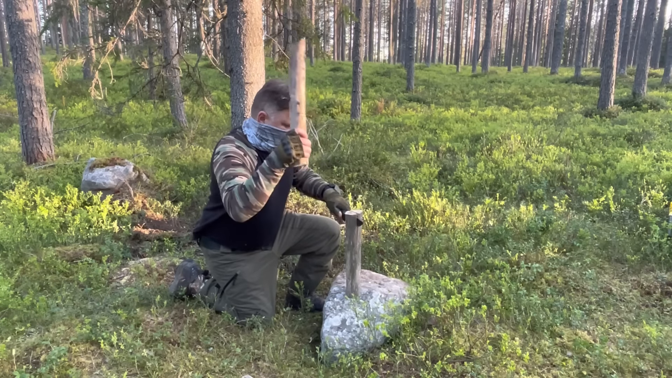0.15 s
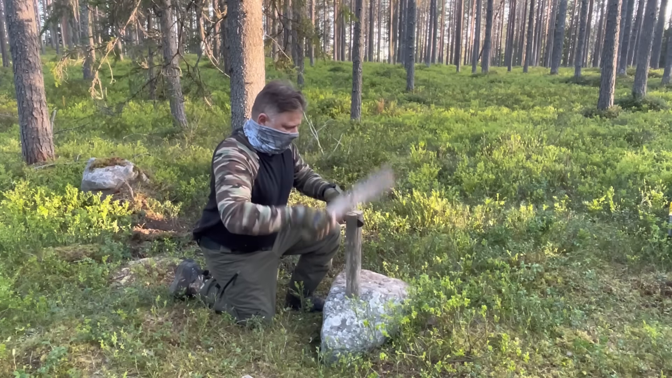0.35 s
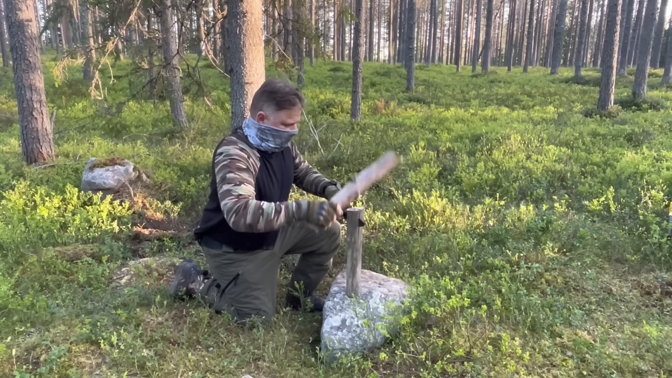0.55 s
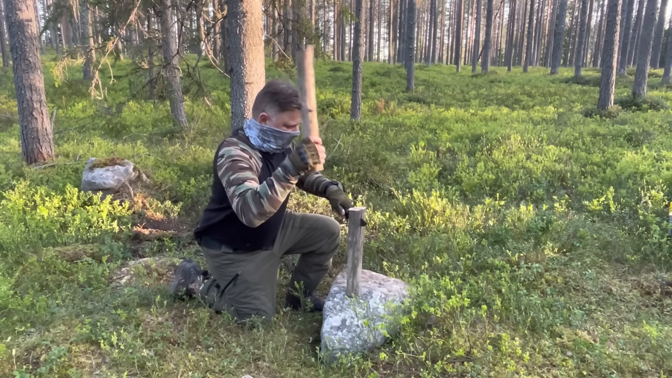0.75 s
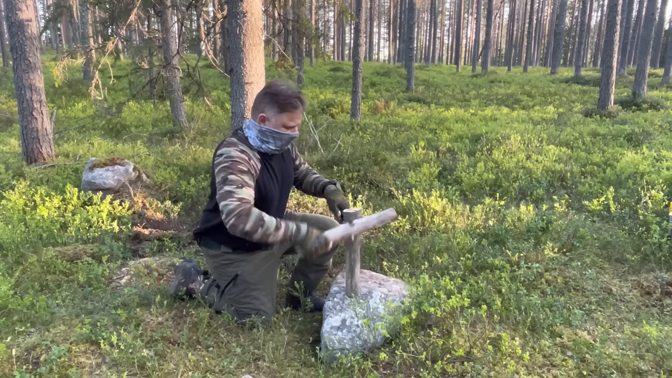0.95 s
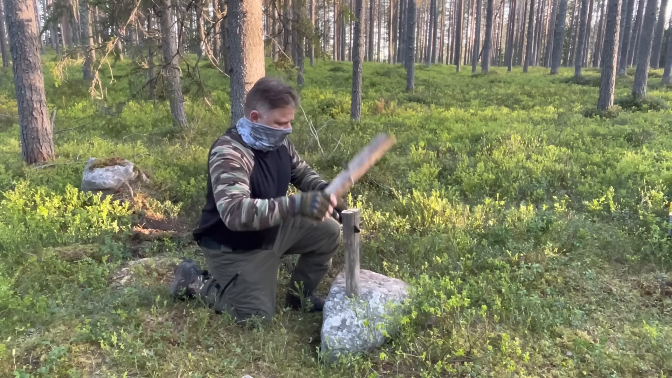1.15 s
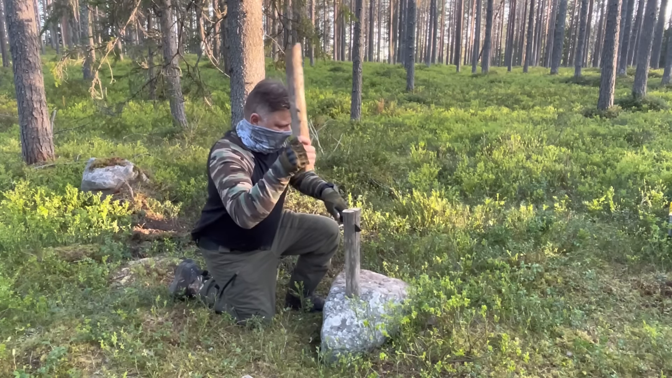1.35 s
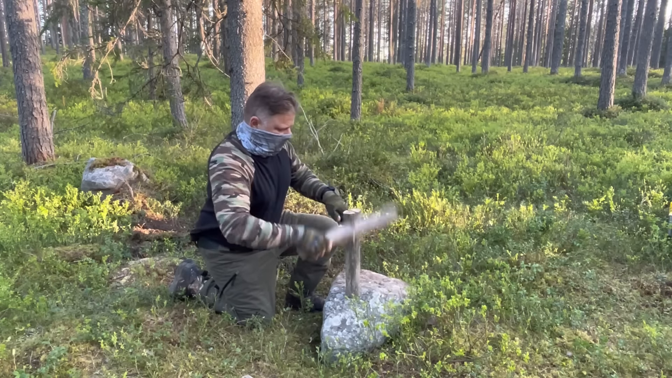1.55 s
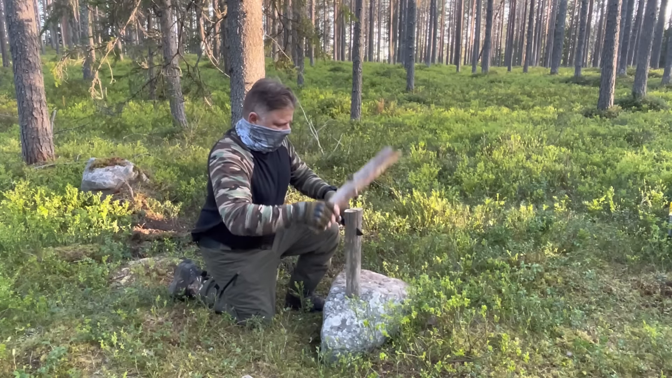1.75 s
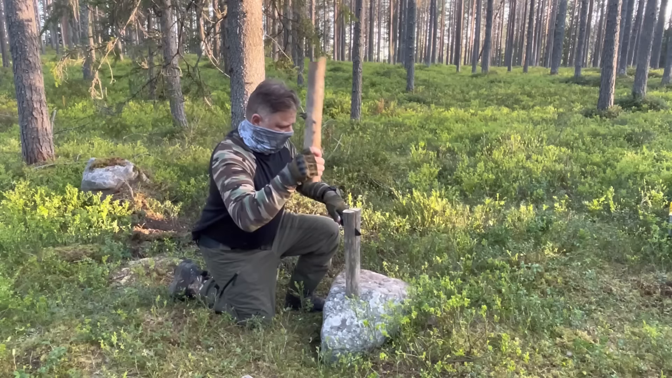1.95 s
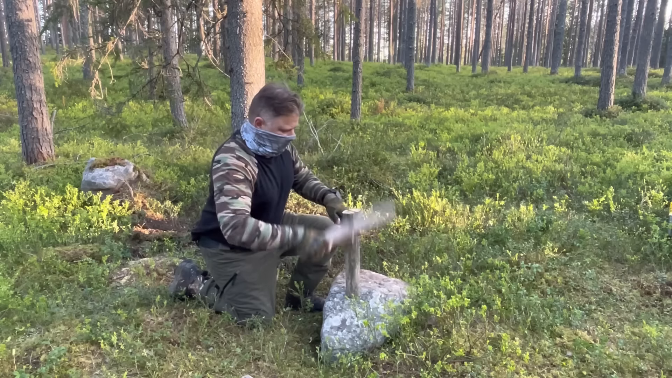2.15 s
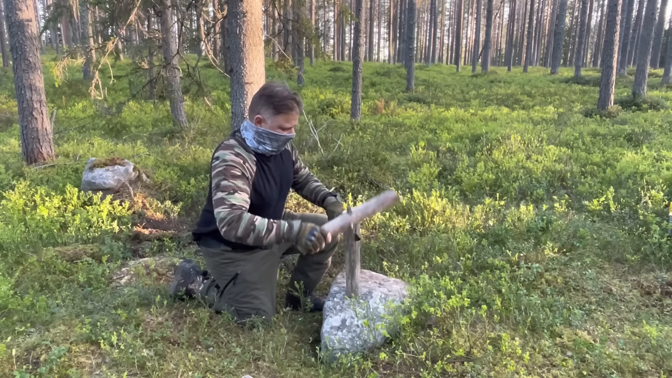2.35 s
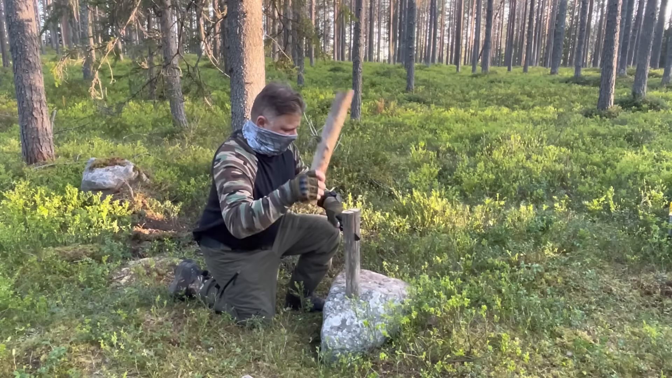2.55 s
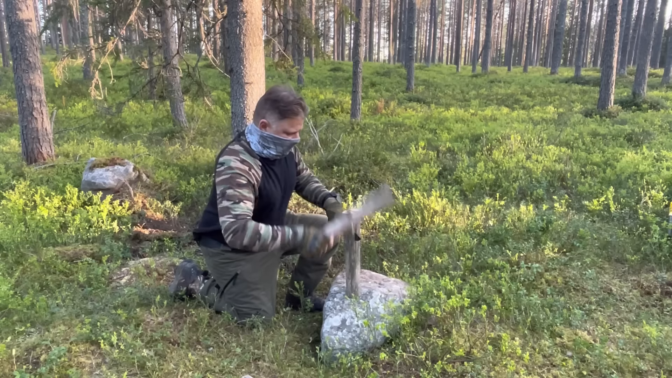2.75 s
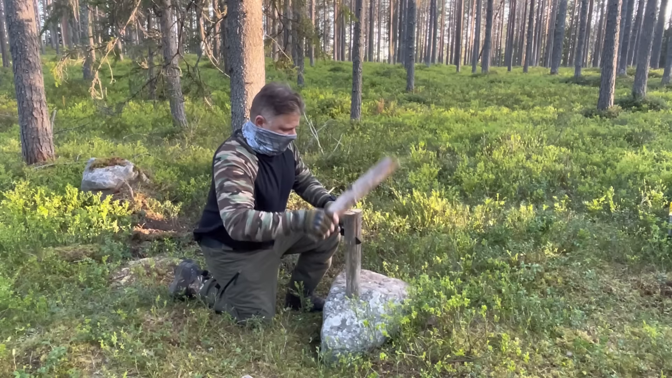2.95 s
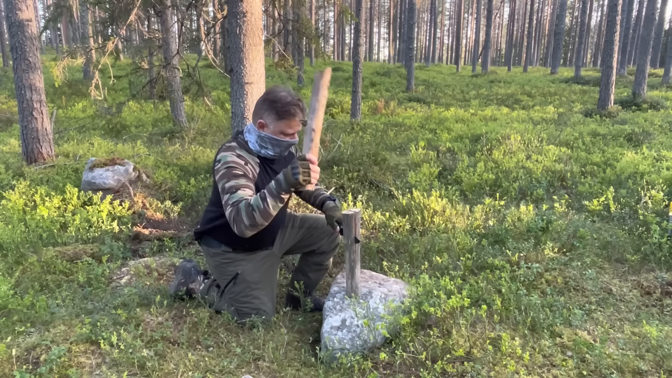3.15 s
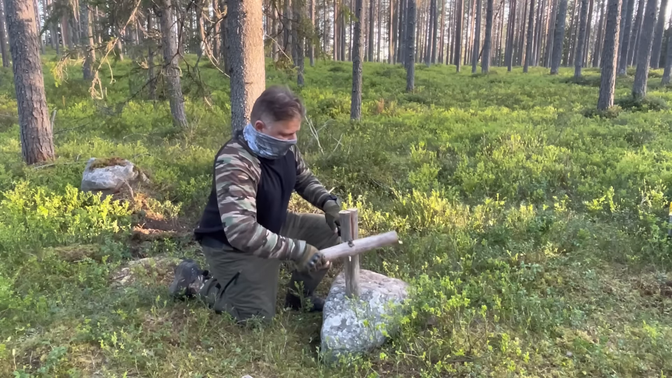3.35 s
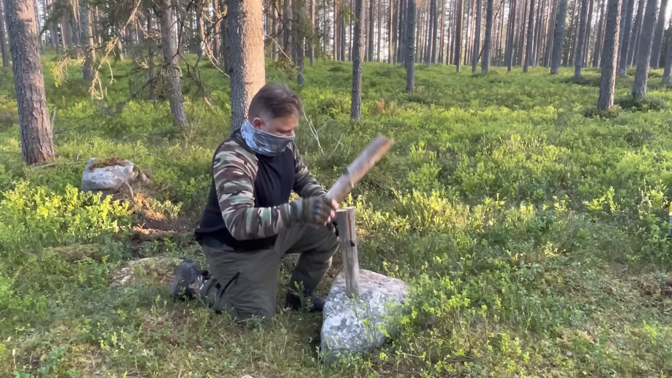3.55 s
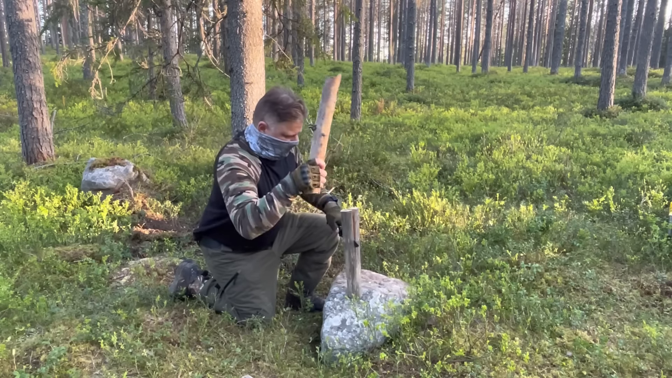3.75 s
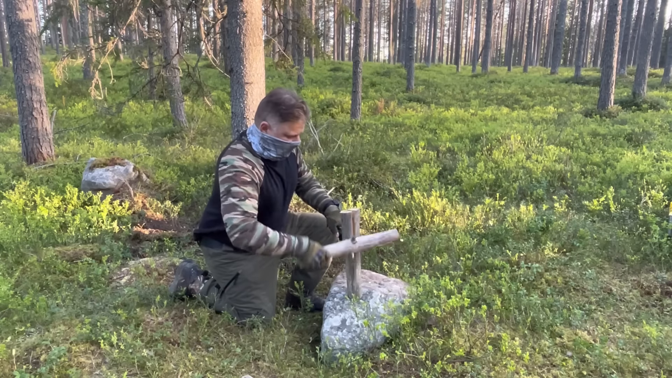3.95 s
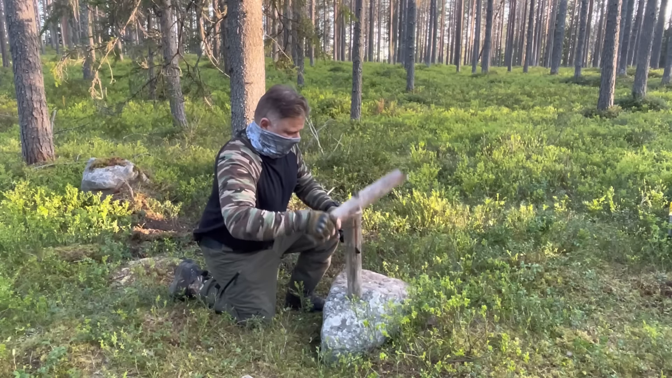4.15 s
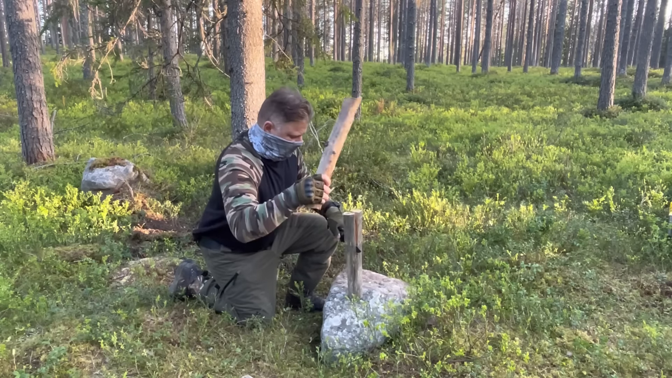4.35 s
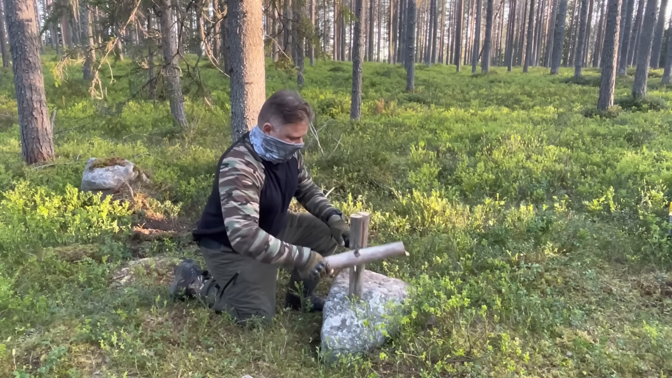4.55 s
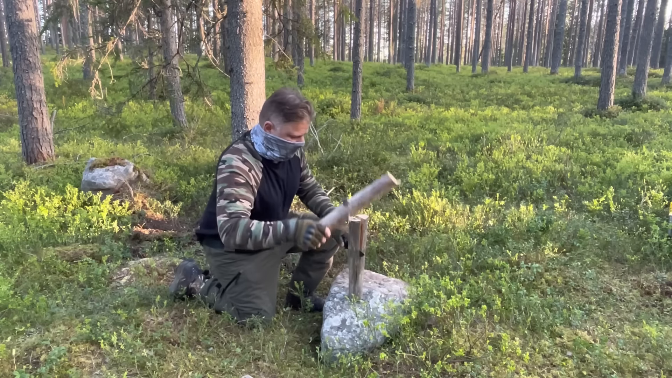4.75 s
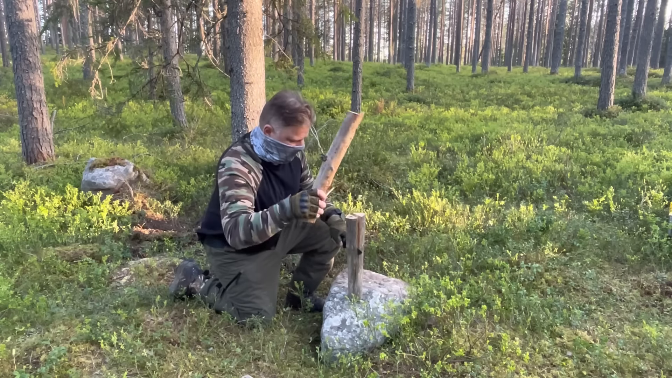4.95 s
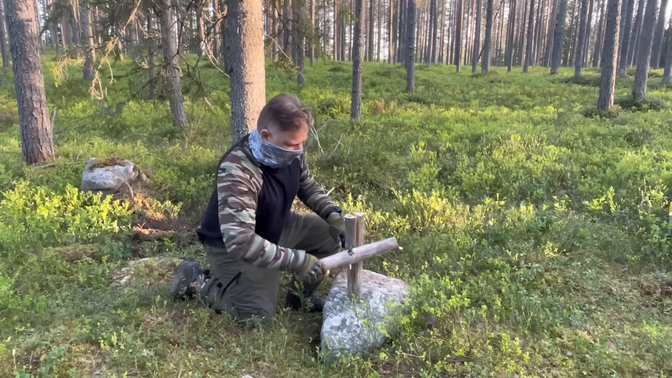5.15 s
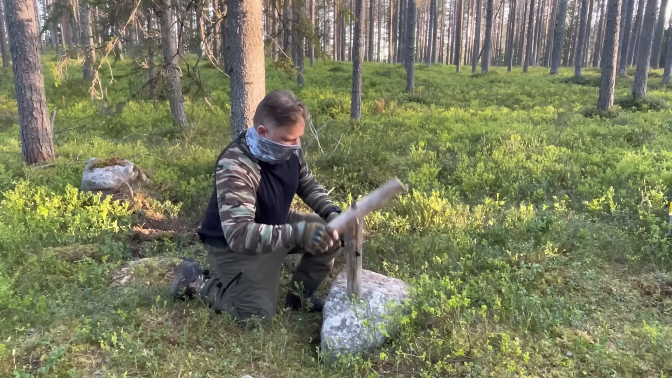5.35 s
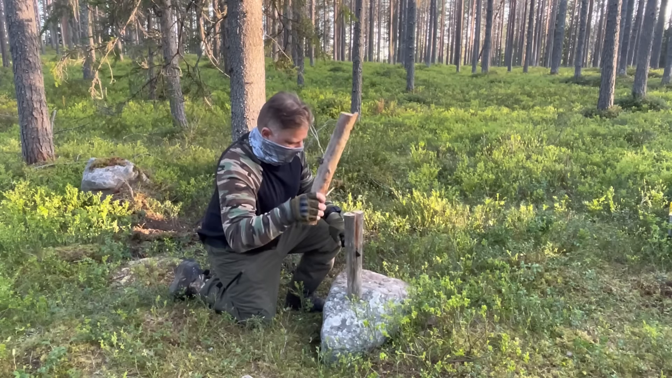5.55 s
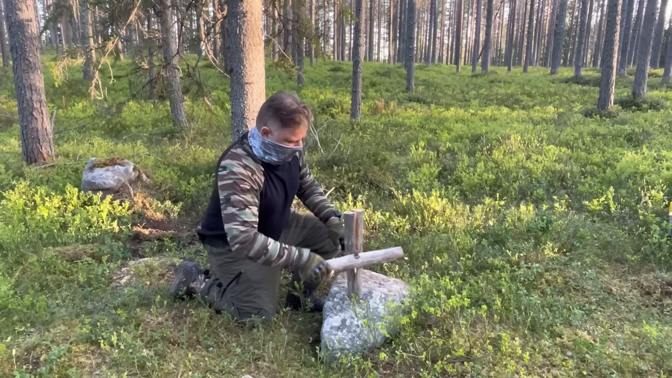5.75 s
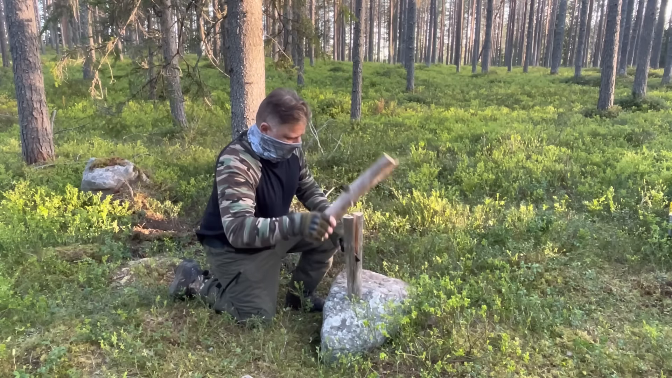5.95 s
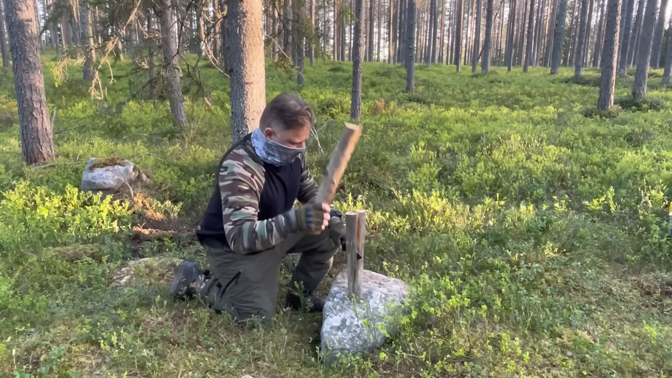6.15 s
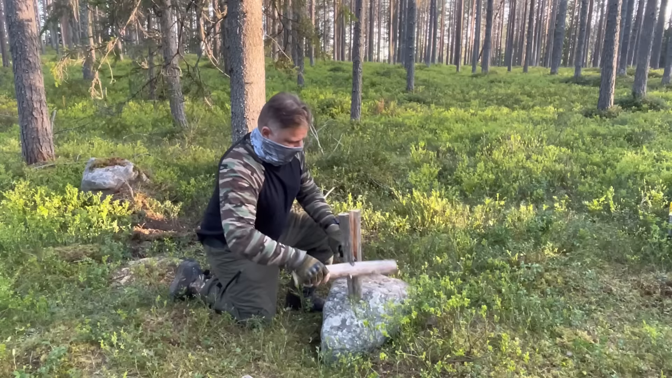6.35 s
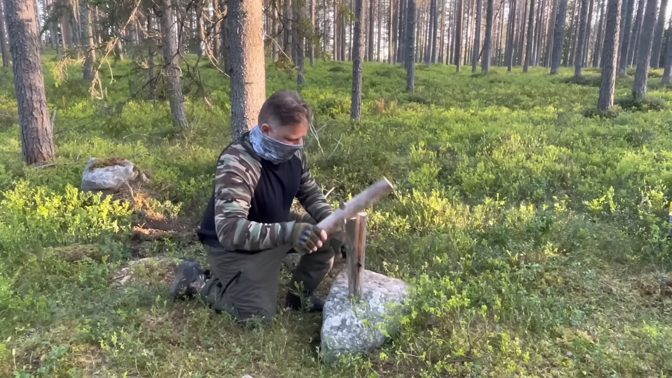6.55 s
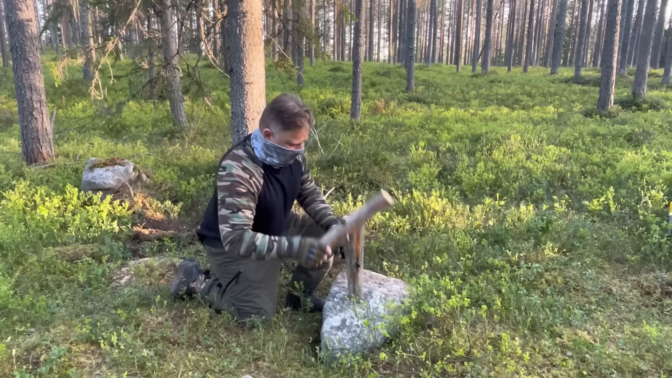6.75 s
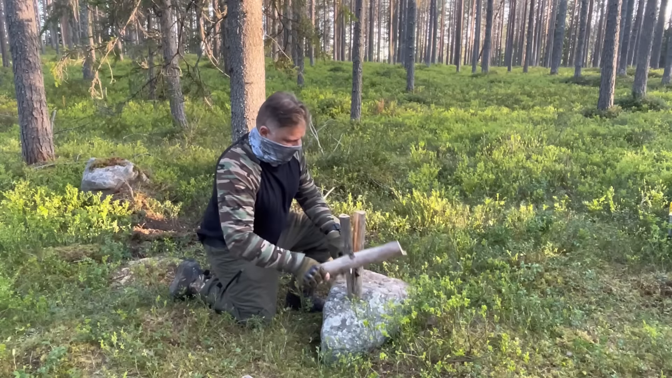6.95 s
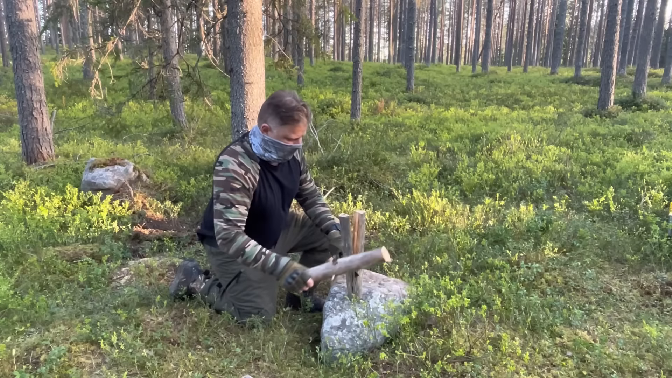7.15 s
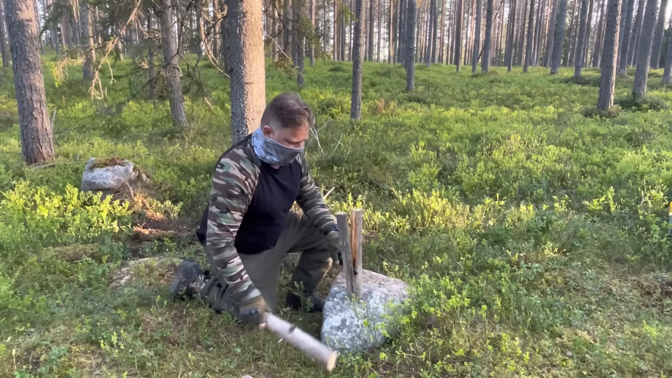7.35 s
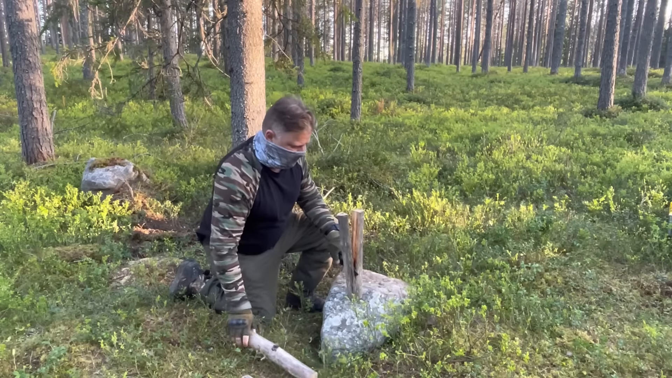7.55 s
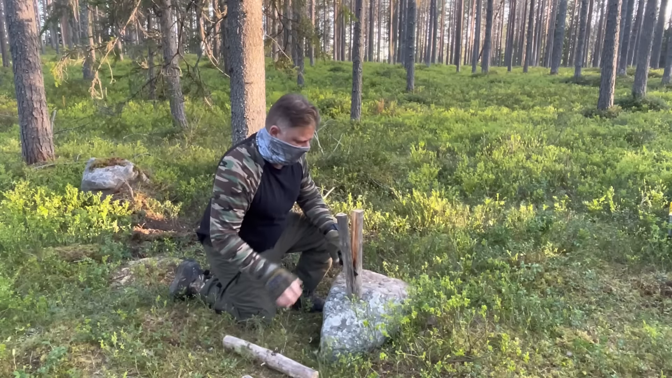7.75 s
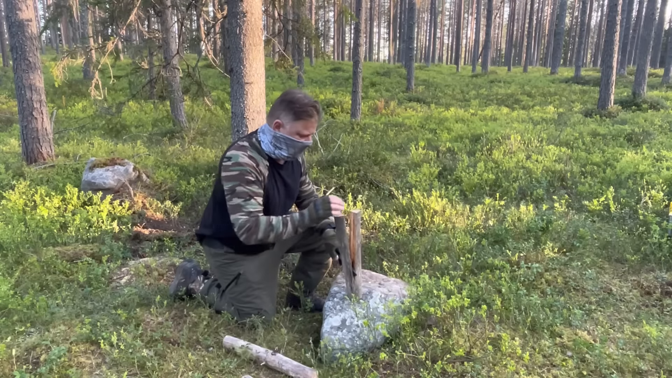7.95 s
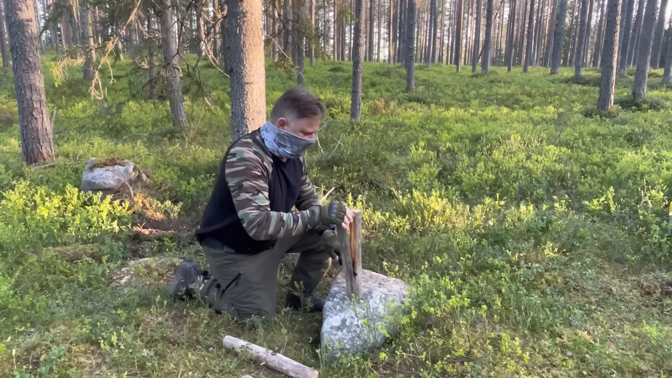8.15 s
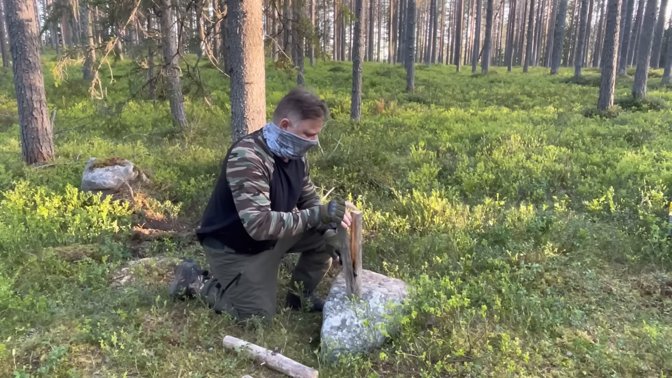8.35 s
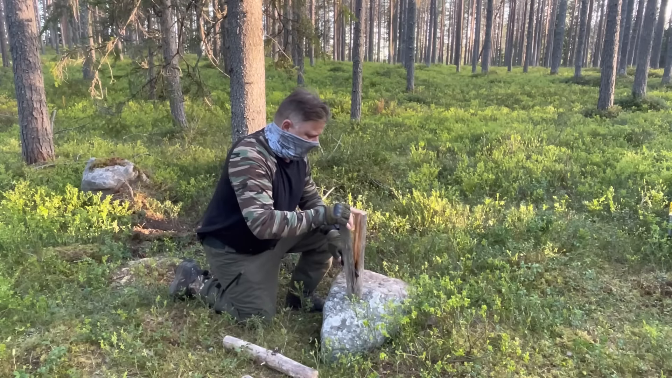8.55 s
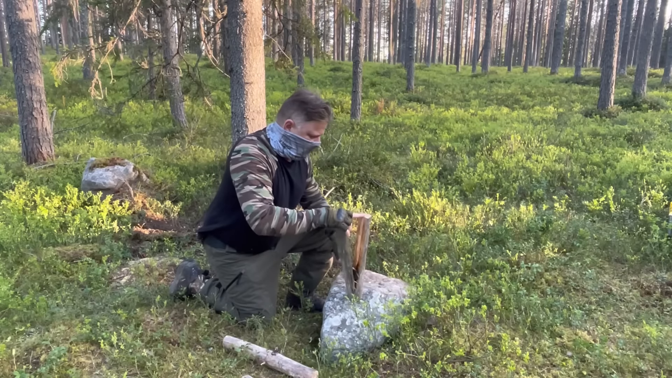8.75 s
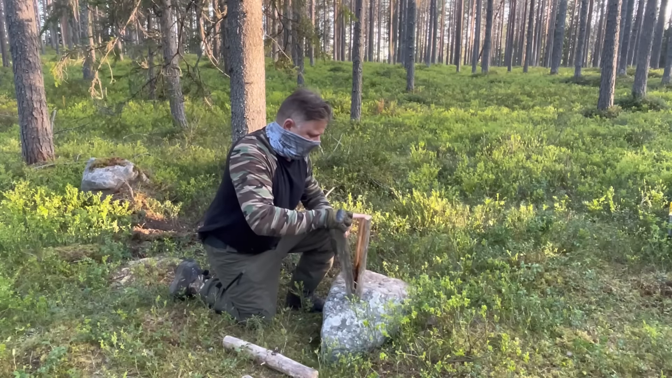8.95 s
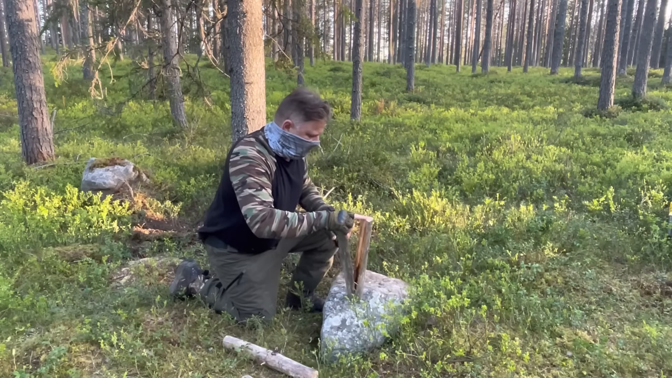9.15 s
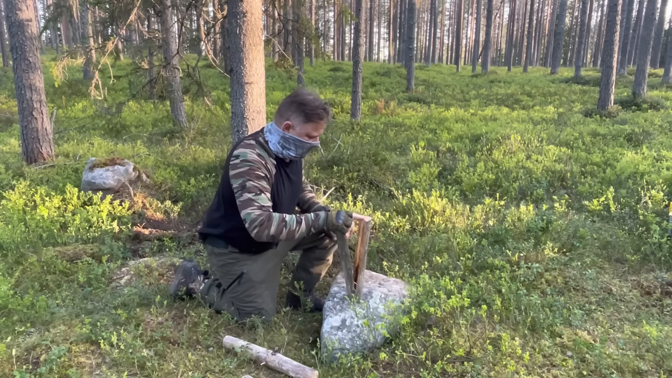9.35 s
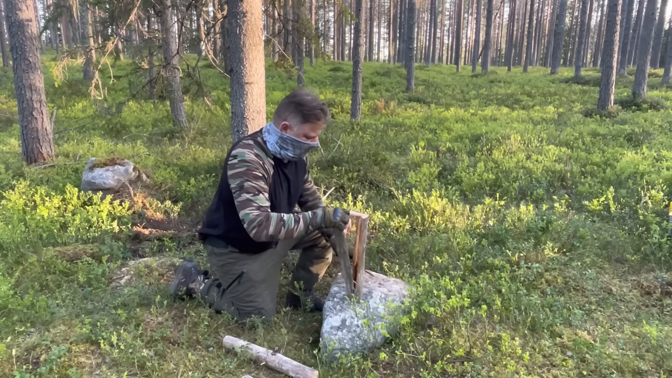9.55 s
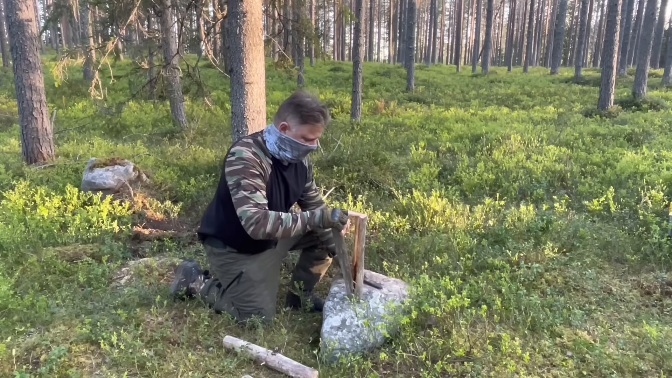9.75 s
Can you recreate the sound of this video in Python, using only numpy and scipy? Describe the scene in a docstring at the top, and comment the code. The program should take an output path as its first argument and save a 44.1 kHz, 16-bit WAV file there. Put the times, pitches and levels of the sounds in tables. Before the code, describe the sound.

Close to the microphone in a still forest, firewood is split with a knife and a wooden baton. Loud, regular knocks ring briefly and return from the trunks, while the wood tears more sharply under the last blows. Much quieter sounds follow: the stick landing on moss, a rustle of sleeves and leaves, and the halves snapping apart and knocking together, over a faint hush of air.

```python
"""A wooden baton drives a knife down through a log on a stone, close to one microphone in a pine forest.
Each blow thuds through the log, rings the baton, clacks the blade and tears fibres; the trunks answer
from farther off, and the hardest blows overload the microphone. Then the baton drops in the undergrowth,
the log is pulled apart by hand and a split piece taps the stone.
Cloth and leaves rustle nearby; behind it all lie a faint hush in the crowns and a low rumble of air."""
import sys
import numpy as np
from scipy import signal
from scipy.fft import rfft, irfft, next_fast_len
from scipy.io import wavfile
from scipy.ndimage import map_coordinates

SR = 44100
rng = np.random.default_rng(int(sys.argv[2]) if len(sys.argv) > 2 else 0)


def output_pcm(signal):
    """Save a mono or channel-first signal as 16-bit PCM at the path in sys.argv[1].

    Samples are clipped to [-1, 1] before scaling.
    """
    pcm = np.clip(np.atleast_2d(signal).T, -1, 1) * 32767
    wavfile.write(sys.argv[1], SR, np.round(pcm).astype(np.int16))


N = 432161
T = np.arange(SR // 6) / SR  # time within one hit, s

# spectrum of the hush in the crowns overhead: f/Hz, level/dB
HUSH_SPECTRUM = [(60, -7.5), (130, 4), (250, 0.5), (400, 0), (700, 0.5), (1300, 0.5), (2000, -5.5),
                 (3200, -11.5), (7500, -13.5), (12000, -14.5), (16000, -18)]
# spectrum of the air's rumble: f/Hz, level/dB
RUMBLE_SPECTRUM = [(10, -2), (22, 6), (45, -8), (80, -15), (130, -22.5), (250, -37.5), (600, -90.5)]
# slow course of that rumble: t/s, level/dB
RUMBLE_LEVELS = [(0, -57), (4, -57), (7.4, -59), (9.8, -59.5)]
# scatter from the ground cover nearby: f/Hz, level/dB
COVER_SPECTRUM = [(100, 1.5), (600, -3.5), (1100, -3.5), (2500, -5), (8000, 3), (15000, -0.5)]
# its decay: f/Hz, t60/s
COVER_DECAY = [(100, 0.097), (2000, 0.28), (12000, 0.088)]
# wash from the trunks all around: f/Hz, level/dB
TRUNK_SPECTRUM = [(100, -13.5), (500, -6), (850, -6), (1080, 8.5), (1300, 0.5), (1850, -1.5), (2220, 5),
                  (2700, -5), (3600, -8), (7000, -10), (14000, -19.5)]
# its decay: f/Hz, t60/s
TRUNK_DECAY = [(200, .4), (1100, 0.47), (2200, 0.55), (5000, .38), (12000, 0.23)]
# distant answer of the deep wood: f/Hz, level/dB
DEEP_SPECTRUM = [(100, -15), (600, -8), (1100, -4), (2200, 1.5), (5000, -3), (12000, -9.5)]
# its decay: f/Hz, t60/s
DEEP_DECAY = [(200, 1.1), (1100, 1.7), (2200, 0.83), (10000, .7)]

# a sleeve, a glove or the baton brushes leaves and bark: peak t/s, peak level/dB, rise/s, fall/s
BRUSHES = [(3.68, -54.5, .035, 0.017), (7.427, -52, 0.067, 0.049), (7.632, -60.5, 0.11, 0.091),
           (8.37, -74.5, .12, .2), (8.585, -62, 0.083, 0.12), (8.742, -45.5, 0.036, 0.044),
           (9.49, -69, .3, 0.16)]
# spectrum of the rustle and of the tick on the stone: f/Hz, level/dB
RUSTLE_SPECTRUM = [(150, -9), (600, -3), (1500, 2), (3500, -5), (7000, -4), (15000, -12)]
# the log rocks on the stone or the ground is bumped: t/s, level/dB
THUMPS = [(0.416, -31.5), (3.682, -56), (7.435, -54.5), (8.74, -53), (8.785, -43)]
# spectrum of a dull thump: f/Hz, level/dB
THUMP_SPECTRUM = [(30, -9.5), (90, 0.5), (170, 3), (300, -0.5), (550, -6), (900, -16), (2500, -40.5)]
# the dropped baton lands and rolls over: t/s, level/dB
BATON_DROPS = [(7.414, -52.5), (7.424, -52), (7.627, -52)]
# modes of the free baton in the moss: f/Hz, level/dB, t60/s
BATON_MODES = [(1070, 5, 0.043), (1540, -5, 0.035), (2250, 6, 0.04), (3450, -4.5, .05)]
# the loosened halves knock together: t/s, level/dB
KNOCKS = [(8.577, -49), (8.739, -39), (8.766, -47), (8.786, -40.5)]
# modes of the halves: f/Hz, level/dB, t60/s
HALF_LOG_MODES = [(400, -10.5, 0.022), (580, 0.5, 0.044), (1030, 8, 0.03), (1305, 24, 0.032),
                  (1720, -23, .02)]
# modes of the split piece: f/Hz, level/dB, t60/s
PIECE_MODES = [(544, -3.5, 0.079), (735, -6, .07), (1686, -3, 0.027), (2420, -7.5, 0.046),
               (3440, -9, 0.078), (4360, -16, 0.043)]

# single fibres snap as the split opens: t/s, f/Hz, level/dB
SNAPS = [(0.0684, 5840, -47), (0.482, 7600, -48), (0.8764, 4200, -49.5), (1.015, 4900, -35.5),
         (1.119, 4965, -34.5), (1.4821, 5550, -48.5), (1.5337, 3697, -55), (2.7965, 6190, -39),
         (2.8211, 4614, -44), (3.118, 6100, -49), (3.4012, 5500, -35), (4.1076, 6600, -56),
         (5.1601, 5750, -36.5), (5.2869, 7920, -47.5), (5.3872, 4640, -49), (5.9114, 4700, -44.5),
         (8.6212, 6900, -50), (8.704, 9100, -41), (8.7233, 7600, -32)]
# rows of snaps along the grain: t/s, length/s, f/Hz, first level/dB, fall to the last/dB
TEARS = [(0.59, .074, 5000, -54, 8), (1.028, 0.033, 6000, -50, 11.5), (5.7, .008, 5214, -20.5, 12.5),
         (6.267, .012, 5360, -22.5, 6.5), (6.825, .052, 5500, -30.5, 22), (8.575, .021, 6100, -50, 8),
         (8.634, .025, 7500, -57.5, -2), (8.735, .028, 6000, -38.5, 10)]
# spectrum of a snapping fibre whose pitch is FIBRE_HZ: f/Hz, level/dB
FIBRE_SPECTRUM = [(150, -29), (900, -16.5), (1600, -3), (3000, -2), (5500, -1), (8000, -1), (11000, -5),
                  (18000, -14)]
# modes of the splinters beside the crack: f/Hz, level/dB, t60/s
SPLINTER_MODES = [(1330, -6, 0.03), (1708, -1.5, 0.021), (3100, -0.5, 0.014), (3640, -3, 0.012),
                  (5350, 0, 0.016)]

# blows of the baton: t/s, baton f/Hz, force/dB, ring/dB, clack/dB, lead of a graze/s (0 for none)
BLOWS = [(0.3933, 1066, -16.5, -8.5, -18.5, 0), (0.9693, 1080, -16, -10.5, -18.5, 0.0011),
         (1.582, 1085, -16, -13, -29, 0), (2.1686, 1107, -16.5, -7.5, -21.5, 0.00073),
         (2.7799, 1115, -15.5, -8.5, -20, 0.00087), (3.3294, 1114, -15, -7.5, -20, 0),
         (3.9558, 1110, -18.5, -14, -27, .006), (4.5194, 1078, -22.5, -29, -17.5, 0.0013),
         (4.547, 1065, -21.5, -30, -38, 0), (5.142, 1083, -18.5, -16, -20, .0043),
         (5.6988, 1112, -15.5, -12, -17, 0.00047), (6.2634, 1085, -21.5, -15.5, -19, .002),
         (6.818, 1081, -19, -22.5, -27.5, .01)]
# modes of the log on the stone: f/Hz, level/dB, t60/s
LOG_MODES = [(89, -13.5, 0.064), (163, -11.5, 0.045), (292, -7.5, .03), (383, 2.5, 0.021), (525, 6, 0.016),
             (661, 2.5, 0.015)]
# modes of the blade wedged in the wood: f/Hz, level/dB, t60/s
BLADE_MODES = [(1545, 1, 0.017), (2190, 3, 0.015), (2514, -1.5, 0.016), (2940, -2, 0.015),
               (3390, -6, 0.012)]
# spectrum of wood being crushed: f/Hz, level/dB
CRACK_SPECTRUM = [(200, -24.5), (1000, 6.5), (2500, 1), (4000, -2.5), (7500, -3), (10000, -7.5),
                  (14000, -9), (17000, -16)]
# boom of the soft forest floor under the stone: f/Hz, level/dB
GROUND_SPECTRUM = [(10, -10.5), (25, 0.5), (60, -4), (100, -10), (200, -34), (500, -91)]

FIBRE_HZ = 5600


def amp(db):
    """Decibels to gain."""
    return 10 ** (np.asarray(db) / 20)


def decay(t60, t=T):
    """A fade of 60 dB every t60 seconds."""
    return amp(-60 * t / t60)


def attack(rise_s, t=T):
    """A rise from 0 towards 1 with time constant rise_s."""
    return 1 - np.exp(-t / rise_s)


def burst(x):
    """Scale a hit to the energy of 10 ms at rms 1."""
    return x / np.sqrt(np.sum(x ** 2) / (SR / 100) + 1e-20)


def along(points, hz):
    """Read (f/Hz, value) points on a log axis."""
    f, values = np.transpose(points)
    return np.interp(np.log(hz + 1), np.log(f + 1), values)


def wobble(rate):
    """A smooth random curve, rate knots a second."""
    knots = rng.standard_normal(int(N * rate / SR) + 4)
    return map_coordinates(knots, [np.arange(N) * rate / SR])


def colour(x, spectrum):
    """Give x a spectrum, at rms 1."""
    size = next_fast_len(len(x))
    gain = amp(along(spectrum, np.fft.rfftfreq(size, 1 / SR)))
    shaped = irfft(rfft(x, size) * gain, size)[:len(x)]
    return shaped / np.sqrt(np.mean(shaped ** 2) + 1e-20)


def grit(size, spectrum, spiky):
    """Noise made of tiny clicks of unequal size."""
    sign, strength = rng.standard_normal((2, size))
    return colour(sign * np.exp(spiky * np.minimum(strength, 2.5)), spectrum)


def add(track, s, x):
    """Mix x into the track at time s."""
    part = track[max(round(s * SR), 0):][:len(x)]
    part += x[:len(part)]


def ring(modes):
    """Damped modes whose strength and pitch vary from hit to hit."""
    hz, db, t60 = np.transpose(modes)[:, :, None]
    louder, higher = rng.standard_normal((2, len(modes), 1))
    hz = hz + higher / (2 * t60)  # the more damped a mode, the less sure its pitch
    partials = amp(db + 2 * louder) * decay(t60) * np.sin(2 * np.pi * hz * T)
    return burst(partials.sum(axis=0))


def air():
    """A faint hush high in the crowns over a low, uneven rumble."""
    hush = amp(-66.5 + .4 * wobble(2)) * colour(rng.standard_normal(N), HUSH_SPECTRUM)
    rumble = colour(rng.standard_normal(N), RUMBLE_SPECTRUM)
    rumble_db = np.interp(np.arange(N) / SR, *np.transpose(RUMBLE_LEVELS))
    return hush + amp(rumble_db + 2 * wobble(5.3)) * rumble


def echo(spectrum, t60s, onset_s):
    """A diffuse tail of energy 1 that builds up over the onset time and dies band by band."""
    hz, t, bands = signal.stft(colour(rng.standard_normal(SR), spectrum), SR, nperseg=256)
    bands = bands * decay(along(t60s, hz)[:, None], t)
    tail = signal.istft(bands, SR, nperseg=256)[1][:SR]
    tail *= 1 - np.exp(-(np.arange(SR) / SR / onset_s) ** 2)
    return tail / np.linalg.norm(tail)


def forest(x):
    """The microphone gets the direct sound, scatter from nearby ground cover, then the deep wood."""
    near = amp(-26) * echo(COVER_SPECTRUM, COVER_DECAY, onset_s=.0034)
    deep = amp(-41.5) * echo(DEEP_SPECTRUM, DEEP_DECAY, onset_s=.013)
    return signal.fftconvolve(x, signal.unit_impulse(SR) + near + deep)


def rustling(stir_db=-79, swing_db=22.5):
    """Cloth and leaves brush nearby in uneven clumps, swelling and dying over the stir of the shrubs."""
    t = np.arange(N) / SR
    level = amp(stir_db)
    for s, db, rise, fall in BRUSHES:
        off_peak = np.maximum((s - t) / rise, (t - s) / fall)
        level = level + amp(db - swing_db * off_peak)
    clumps = amp(2 * wobble(70))
    return level * clumps * grit(N, RUSTLE_SPECTRUM, spiky=.41)


def thump():
    """A soft, heavy contact without any ring."""
    return burst(grit(len(T), THUMP_SPECTRUM, spiky=.33) * decay(.035) * attack(.00086))


def loose_wood(tap_s=9.721, tap_db=-55.5):
    """The log rocks; the baton lands softly in the moss; the halves knock; one piece taps the stone."""
    out = np.zeros(N)
    for s, db in THUMPS:
        add(out, s, amp(db) * thump())
    for s, db in BATON_DROPS:
        add(out, s, amp(db) * burst(ring(BATON_MODES) * attack(.0026)))
    for s, db in KNOCKS:
        add(out, s, amp(db) * ring(HALF_LOG_MODES))
    tick = burst(grit(len(T), RUSTLE_SPECTRUM, spiky=.6) * decay(.081))
    tap = amp(2) * ring(PIECE_MODES) + amp(-3) * tick
    add(out, tap_s, amp(tap_db) * tap)
    return out


def snap(hz):
    """A fibre parts with a sharp tick, higher for a thinner one, and the splinters beside it shiver."""
    spectrum = np.array(FIBRE_SPECTRUM) * [hz / FIBRE_HZ, 1]
    envelope = (decay(.01) + amp(-21.5) * decay(.045)) * attack(.0005)
    tick = burst(grit(len(T), spectrum, spiky=.38) * envelope)
    shiver = burst(ring(SPLINTER_MODES) * attack(.001))
    return tick + amp(-9) * shiver


def tearing(count):
    """The split runs along the grain, fibre after fibre, unevenly. Rows: t/s, f/Hz, level/dB."""
    snaps = []
    for s, length, hz, db, fall_db in TEARS:
        scatter = .12 * rng.standard_normal(count)  # share of the gap between snaps
        scatter[0] = 0
        shares = (np.arange(count) + scatter) / (count - 1)
        snaps += [(s + length * share, hz, db - fall_db * share) for share in shares]
    return snaps


def straining(count, mean_delay_s=.046, start_db=-47, fall_db_per_s=150, spread_db=3):
    """Small fibres give way after each blow, ever rarer and fainter. Rows: t/s, f/Hz, level/dB."""
    snaps = []
    for s, *_ in BLOWS:
        for delay in rng.exponential(mean_delay_s, count):
            db = start_db - fall_db_per_s * delay + spread_db * rng.standard_normal()
            snaps.append((s + delay, FIBRE_HZ, db))
    return snaps


def splitting():
    """Fibres part singly, in tears along the grain, and faintly under the wedge after each blow."""
    out = np.zeros(N)
    for s, hz, db in SNAPS + tearing(count=4) + straining(count=2):
        add(out, s, amp(db) * snap(hz))
    return out


def log_thud(corner_hz=199):
    """The blow shoves the log; so small a body pushes little air at low frequencies."""
    motion = ring(LOG_MODES) * attack(.00065)
    highpass = signal.butter(1, corner_hz, "highpass", fs=SR, output="sos")
    return -burst(signal.sosfilt(highpass, motion))


def strike(hz, force_db, ring_db, clack_db):
    """One contact near the microphone bends the baton, shoves the log, clacks the blade, crushes wood."""
    # the baton's first bending mode swells while it is still pressed on the knife's spine
    swell = 1 - np.exp(-(T / .0022) ** 2)
    bend = amp(ring_db + .5) * burst(np.sin(2 * np.pi * hz * T) * decay(.022) * swell)
    thud = amp(force_db) * log_thud()
    clack = amp(clack_db) * burst(ring(BLADE_MODES) * attack(.0024))
    crack_db = force_db - 4.5
    crack = amp(crack_db) * burst(grit(len(T), CRACK_SPECTRUM, spiky=1) * decay(.026) * attack(.0005))
    out = forest(bend + thud + clack + crack)
    # the trunks all around return clack and crack as one diffuse wash
    wash_gain = amp(clack_db - 8.5) + amp(crack_db - 6)
    add(out, 0, wash_gain * echo(TRUNK_SPECTRUM, TRUNK_DECAY, onset_s=.048))
    # the soft floor booms under the stone
    t = np.arange(SR) / SR
    boom = colour(rng.standard_normal(SR), GROUND_SPECTRUM) * decay(.3, t) * attack(.01, t)
    add(out, 0, amp(force_db - 32) * boom)
    return out


def batoning(graze_db=-11, graze_pitch_ratio=1.1, settle_s=.025, settle_db=-30):
    """The baton often grazes just before it lands; after each blow the log drops back on the stone."""
    out = np.zeros(N)
    for s, hz, force_db, ring_db, clack_db, lead in BLOWS:
        add(out, s, strike(hz, force_db, ring_db, clack_db))
        if lead > 0:
            graze = strike(hz * graze_pitch_ratio, force_db, ring_db, clack_db)
            add(out, s - lead, amp(graze_db) * graze)
        add(out, s + settle_s, amp(force_db + settle_db) * thump())
    return out


def scene():
    """One microphone close to the log, with the forest all around."""
    return (batoning() + forest(splitting() + loose_wood())[:N] + rustling() + air())[None]


def record(dry):
    """The hardest blows overload the microphone and flatten at full scale; the top is cut at 16 kHz."""
    clipped = dry / (1 + np.abs(dry) ** 14) ** (1 / 14)
    size = next_fast_len(N + SR // 2)
    lowpass = 1 / (1 + (np.fft.rfftfreq(size, 1 / SR) / 16000) ** 120)
    return irfft(rfft(clipped, size) * lowpass, size)[:, :N]


dry = scene()
out = record(dry)
output_pcm(out)
```